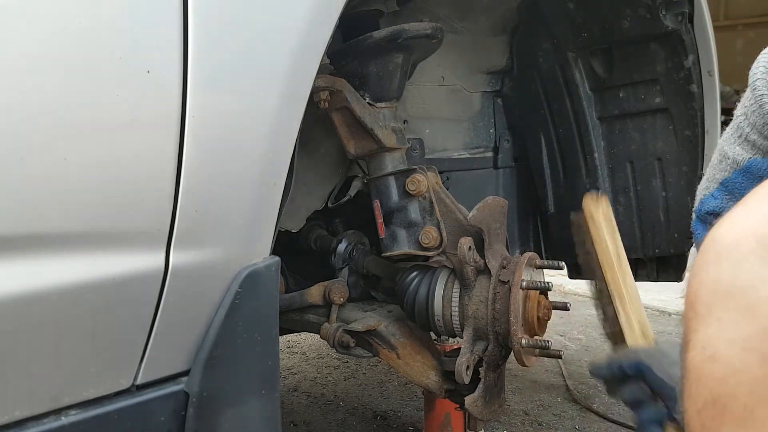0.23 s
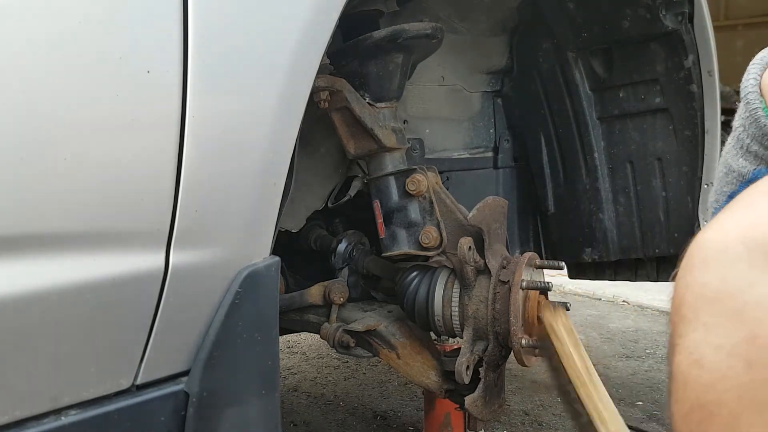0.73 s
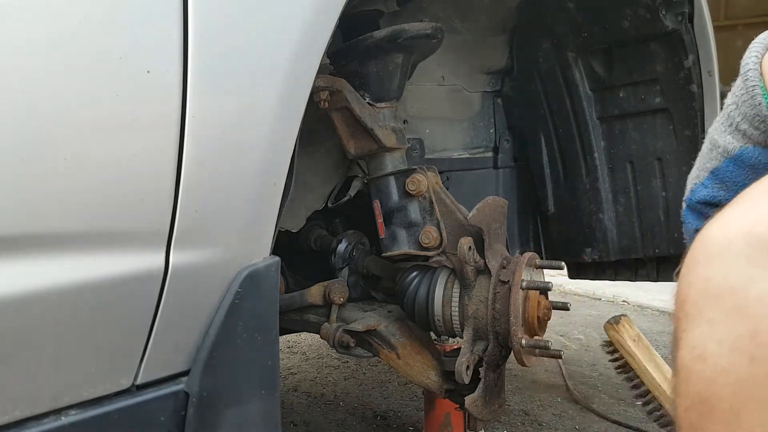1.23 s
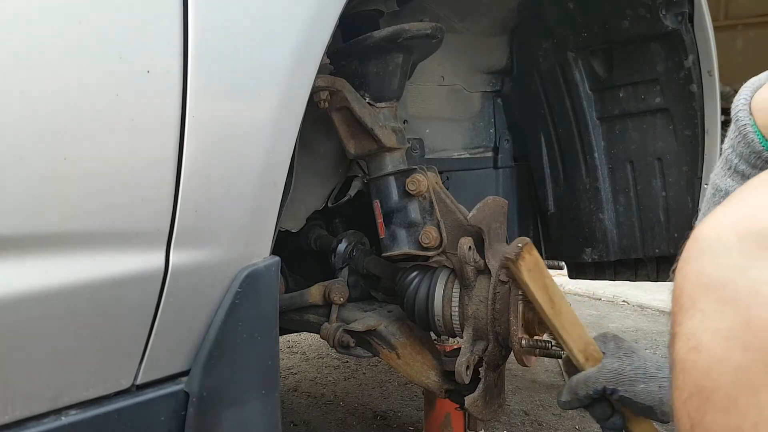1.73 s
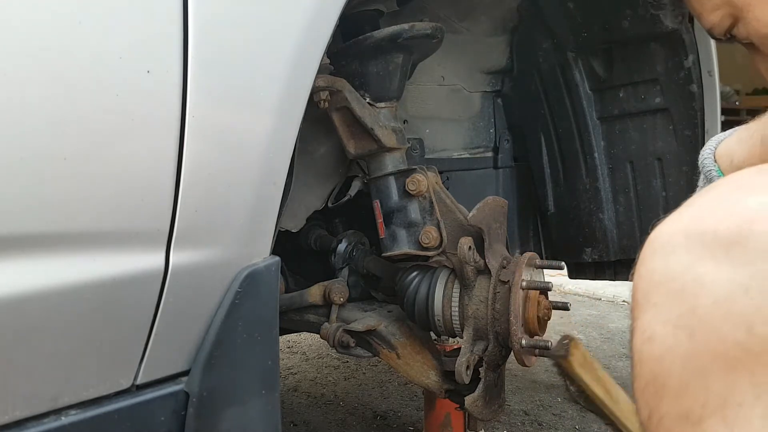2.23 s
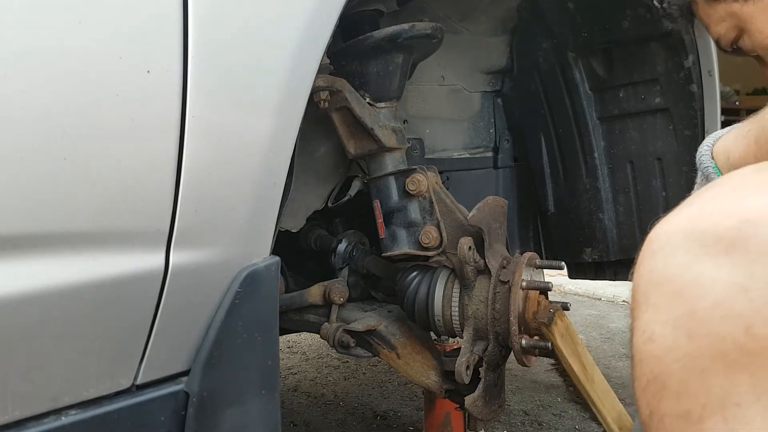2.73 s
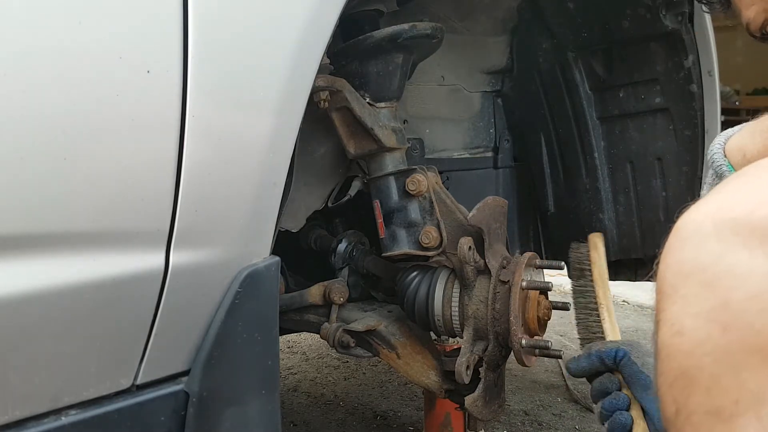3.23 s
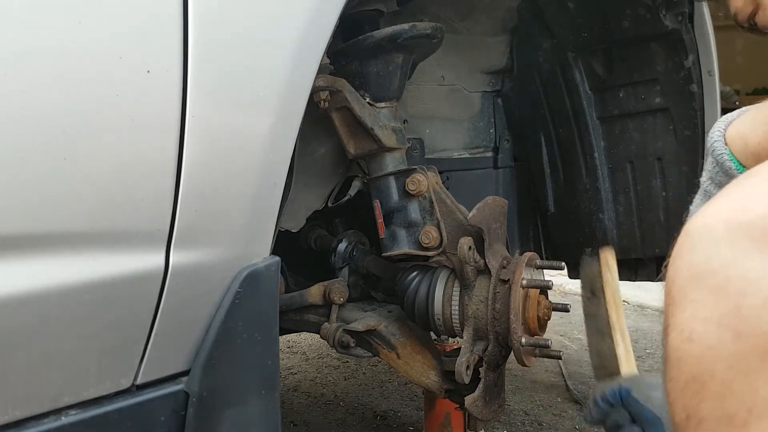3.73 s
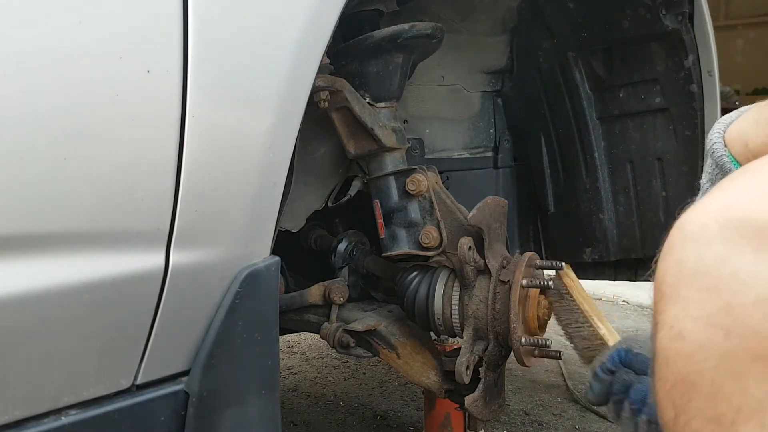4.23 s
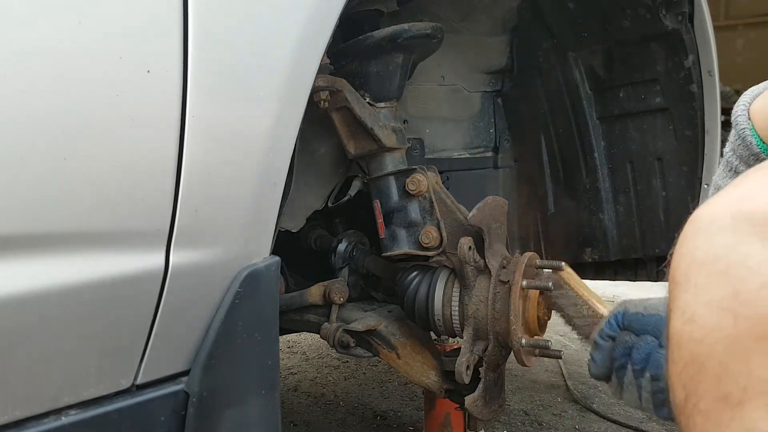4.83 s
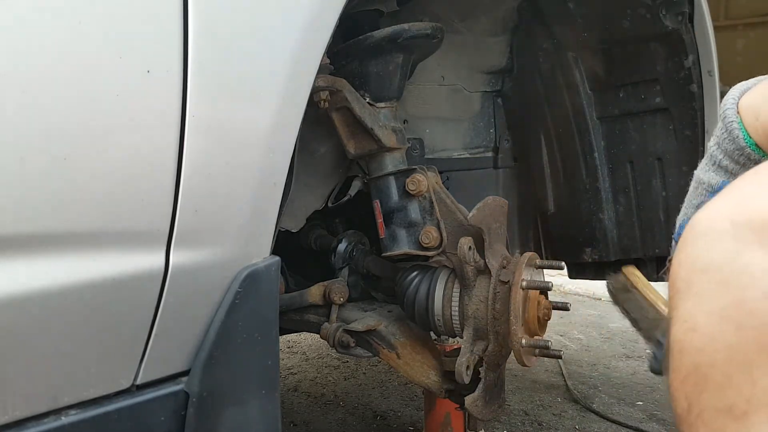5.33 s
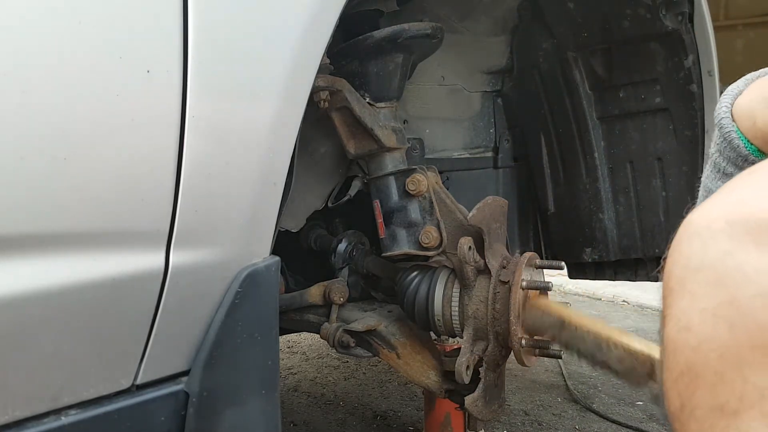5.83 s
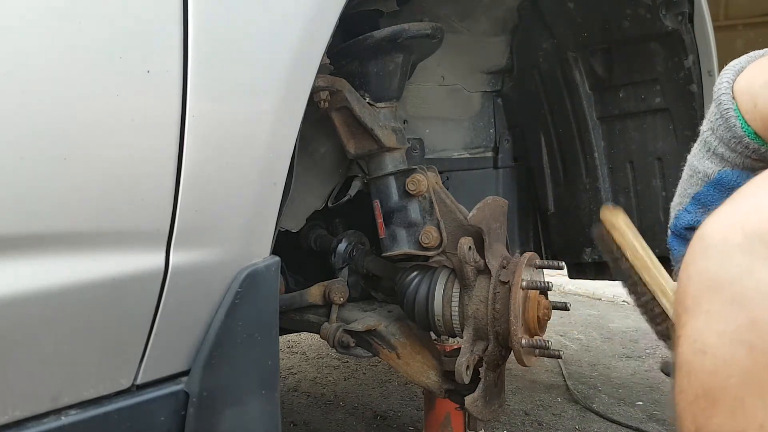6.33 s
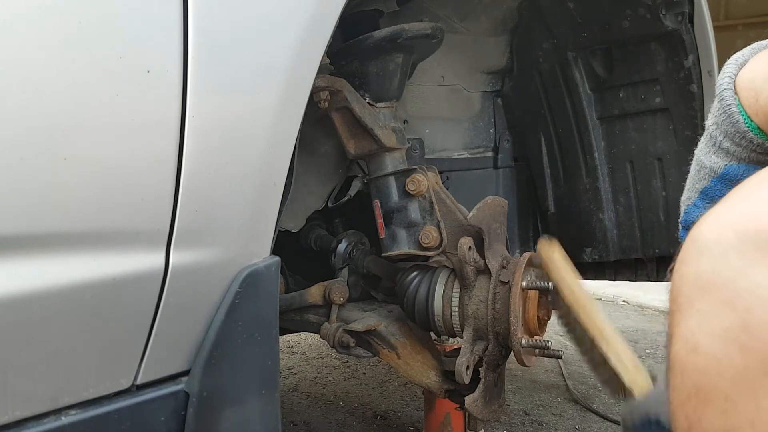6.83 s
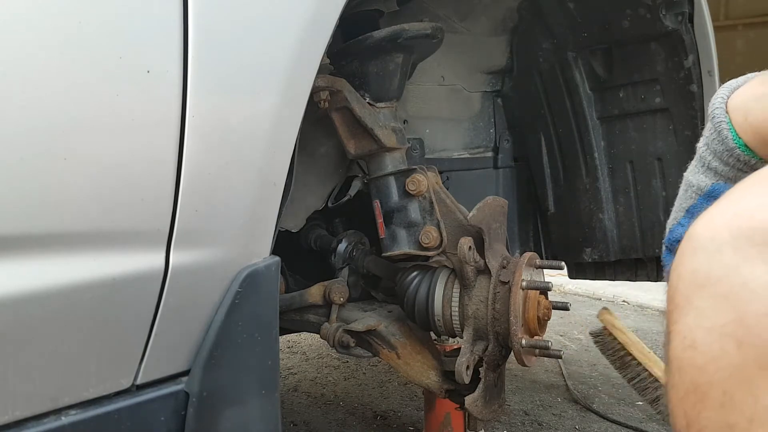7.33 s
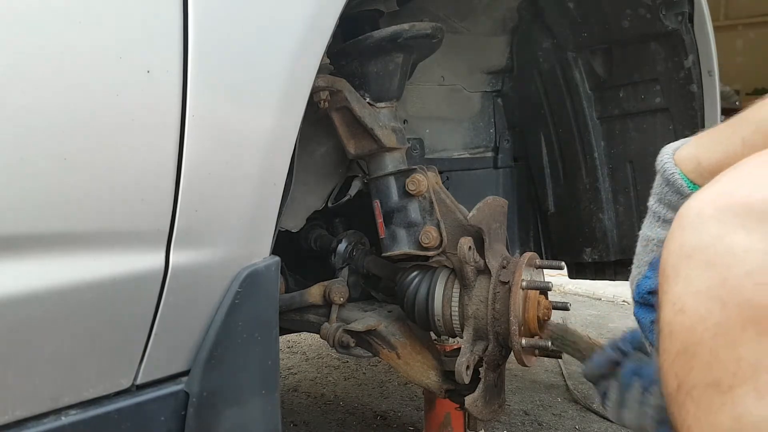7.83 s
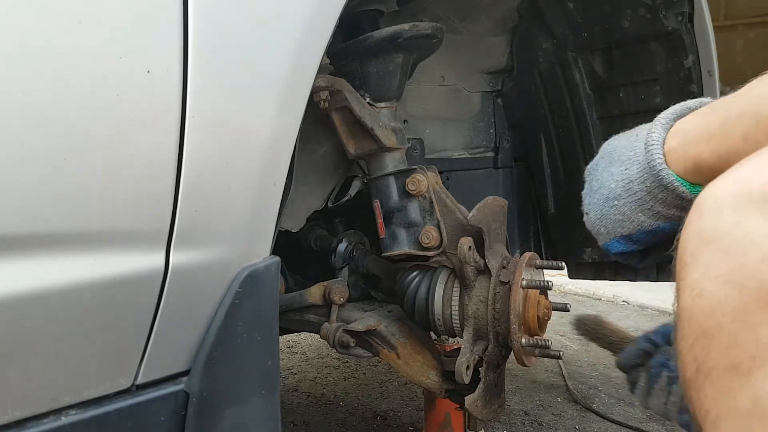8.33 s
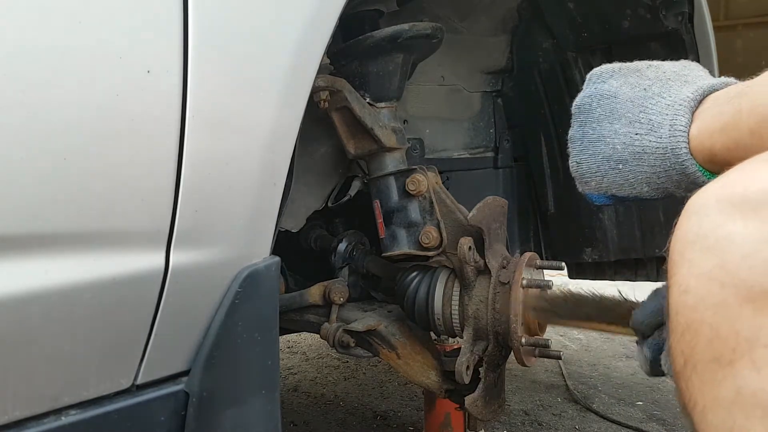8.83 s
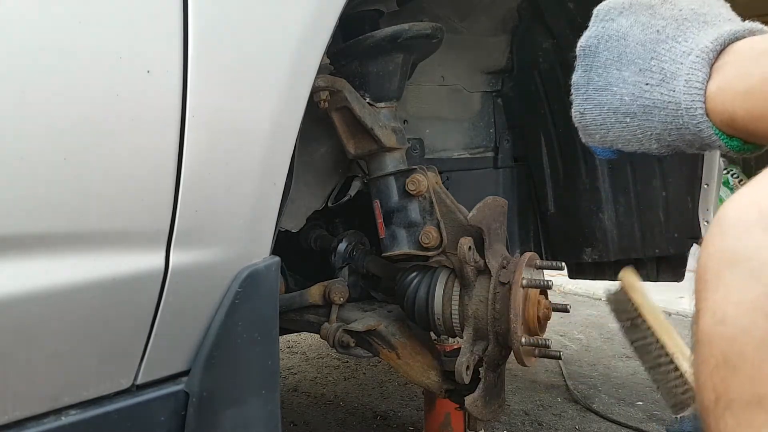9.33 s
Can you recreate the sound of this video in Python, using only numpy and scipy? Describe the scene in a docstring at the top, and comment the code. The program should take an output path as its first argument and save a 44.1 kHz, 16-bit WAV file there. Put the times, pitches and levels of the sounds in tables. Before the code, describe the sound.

Close, rasping wire brush strokes on rusty car metal, the wooden back clacking against the studs as the hub rings faintly.

```python
"""A steel wire brush with a wooden back is swept across a rusty wheel hub in a garage.
Stick-slip friction makes the wires hiss and scrape, and the load rumbles through the suspension.
The back knocks against the wheel studs; the hub flange rings on in beating modes after each stroke.
Behind it are a rustling glove, flicking wires, far metal taps and an outdoor hum. The garage
reverberates, and a phone with two microphone ports stands close by."""
import sys
import numpy as np
from scipy import signal
from scipy.fft import rfft, irfft, next_fast_len
from scipy.io import wavfile
from scipy.ndimage import uniform_filter1d, map_coordinates

SR = 44100
rng = np.random.default_rng(int(sys.argv[2]) if len(sys.argv) > 2 else 0)


def pcm_store(signal):
    """Save signal as 16-bit PCM."""
    levels = np.round(np.clip(np.atleast_2d(signal), -1, 1) * 32767)
    wavfile.write(sys.argv[1], SR, levels.astype(np.int16).T)


N = 423360

# Brush strokes: start_s, bite_db, tick_db, full_pressure_db, full_after_s, lift_after_s, weight_db,
# low_ring_db, middle_ring_db, high_ring_db
STROKES = [(0.043, -46.0, -29.0, -52.5, 0.031, 0.097, -3, -69, -61, -60),
           (0.377, -45.5, -33.5, -50.5, 0.039, 0.099, -4, -59.0, -61.5, -63.5),
           (0.701, -42, -25, -48.5, 0.045, 0.12, -5, -59.5, -56.5, -61),
           (1.028, -45.5, -31.5, -49.5, 0.027, 0.11, -1.5, -59, -61.5, -61.5),
           (1.434, -70, -60.0, -71.0, 0.058, 0.052, 0, -86, -94.0, -94),
           (1.821, -61, -30.5, -78.0, 0.049, 0.066, 0, -66, -76, -76.0),
           (1.9, -74, -43.5, -58.5, 0.075, 0.12, -7, -76.0, -80.0, -74.0),
           (2.04, -70, -60.0, -50, 0.084, 0.21, -10, -72, -70, -69.0),
           (2.416, -53.5, -39, -51, 0.095, 0.16, -1, -57, -61, -61),
           (2.739, -64, -37, -52, 0.031, 0.044, 5.5, -58, -85.0, -70),
           (2.842, -62, -52, -66.5, 0.007, 0.016, 3, -71, -84, -87),
           (3.427, -50.5, -30, -49.5, 0.13, 0.18, -2, -52, -62, -59.5),
           (3.9, -43, -28.0, -51, 0.03, 0.1, 1, -60.5, -62, -73),
           (4.233, -48.5, -34.0, -52, 0.057, 0.12, -4, -67, -69.0, -67.0),
           (4.533, -49.5, -37.5, -49, 0.088, 0.11, -1.5, -61.5, -75.0, -59.5),
           (4.84, -54, -42, -53.0, 0.082, 0.12, 0, -70.0, -82.0, -79.0),
           (5.157, -45, -30, -50, 0.067, 0.1, 3, -68, -64.5, -61),
           (5.469, -46.5, -35.0, -52.0, 0.053, 0.11, 3, -64, -67, -74.0),
           (5.772, -48.5, -32.5, -50.5, 0.08, 0.11, 3, -64.0, -61.5, -64.5),
           (6.079, -50.5, -38.5, -51.0, 0.087, 0.11, 4.5, -62.0, -56, -66),
           (6.56, -39.5, -27, -48, 0.071, 0.096, 1.5, -58, -57, -60),
           (6.877, -68.0, -32, -49.5, 0.058, 0.096, 1, -63.0, -58, -60.5),
           (7.187, -62, -43, -51.5, 0.028, 0.12, 2.5, -56.5, -68.0, -65.0),
           (7.817, -52, -27.5, -52.5, 0.045, 0.12, -2.5, -71.0, -75.0, -74.0),
           (8.117, -47, -29, -50, 0.069, 0.11, 0, -56, -61.5, -59),
           (8.42, -48, -42, -51.5, 0.057, 0.14, -0.5, -66.0, -62, -62.5),
           (8.719, -69, -38, -50, 0.056, 0.11, 7, -53.0, -54.5, -68),
           (9.07, -42, -23.0, -51.5, 0.05, 0.066, -2, -65.5, -60, -61.5)]
# Mode pairs of the hub flange: pitch_hz, split_hz, t60_s
FLANGE_MODES = [(3901, -8, .65), (4558, -8, 1.2), (6244, 10, .38), (8138, -21, .26), (11083, -37, .3)]
# Modes of a wheel stud: pitch_hz, width_hz, level_db
STUD_MODES = [(2436, 157, 3.5), (3300, 83, -11), (3660, 53, -16), (3900, 94, 5), (5060, 110, -2.5),
              (6400, 430, -2.5)]


def amp(db):
    return 10 ** (np.asarray(db) / 20)


def unit(x):
    return x / np.sqrt(np.mean(x ** 2) + 1e-20)


def along(points, hz):
    """Interpolation of (frequency_hz, value) points on a logarithmic frequency axis."""
    f, v = np.transpose(points)
    return np.interp(np.log(hz + 1), np.log(f + 1), v)


def wobble(rate):
    """Smooth random modulation with rate knots a second."""
    return map_coordinates(rng.standard_normal(int(N * rate / SR) + 4), [np.arange(N) * rate / SR])


def filtered(x, response):
    """Linear filtering: the spectrum of x times a complex frequency response."""
    m = next_fast_len(N + SR // 2)
    return irfft(rfft(x, m) * response(np.fft.rfftfreq(m, 1 / SR)), m)[..., :N]


def resonances(modes):
    """Modal superposition: damped resonators (pitch_hz, width_hz, level_db) add with alternating sign."""
    return lambda f: sum((-1) ** k * amp(db) * 1j * f * width / (hz * hz - f * f + 1j * f * width)
                         for k, (hz, width, db) in enumerate(modes))


def stereo(pair, coherence):
    """Partial coherence: two unrelated signals mix as mid and side into left and right."""
    angle = lambda hz: np.arccos(np.clip(along(coherence, hz), -1, 1)) / 2
    mid, side = filtered(pair, lambda hz: np.array([np.cos(angle(hz)), np.sin(angle(hz))]))
    return np.array([mid + side, mid - side])


def grit(spectrum, grain_rate, grain_db):
    """Random amplitude modulation: a coloured noise pair of rms 1 whose level jumps in grains."""
    grains = amp(grain_db * wobble(grain_rate)) * rng.standard_normal((2, N))
    return unit(filtered(grains, lambda hz: amp(along(spectrum, hz))))


def blows(events, modes, crack, vary_db):
    """Impact excitation: an impulse and a dying rattle drive the modes at each (start_s, db, t60_s)."""
    out, t = np.zeros((2, N + SR)), np.arange(SR // 4) / SR
    hz = np.fft.rfftfreq(len(t), 1 / SR)
    fade = np.clip(20 * (t[-1] - t) - 1, 0, 1)
    shapes = np.array([(-1) ** k * resonances([mode])(hz) for k, mode in enumerate(modes)])
    for s, db, t60 in events:
        shake = amp(-60 * t / max(t60, .001)) * rng.standard_normal((2, len(t)))
        shake[:, 0] = crack
        response = amp(vary_db * rng.standard_normal(len(modes))) @ shapes
        sound = fade * irfft(rfft(shake) * response, len(t))
        out[:, round(s * SR):][:, :len(t)] += amp(db) * sound / np.abs(sound).max(axis=1, keepdims=True)
    return out[:, :N]


def outdoor_hum():
    """Ambient noise enters through the open door, its level swaying a little."""
    # Spectrum of the hum: frequency_hz, density_db
    spectrum = [(12, -23), (20, -13), (43, -1.5), (200, -7), (289, -11.5), (404, -6.5), (729, -13.5),
                (2510, -18.5), (2810, -23), (4930, -28), (9670, -41.5), (15200, -31.5), (16500, -49)]
    # Likeness of left and right: frequency_hz, coherence
    coherence = [(60, .45), (600, .3), (1500, .05)]
    hum = unit(stereo(grit(spectrum, grain_rate=20, grain_db=2.0), coherence))
    sway = amp(wobble(1.5))
    return amp(-56.5) * sway * hum


def garage(x):
    """Reverberation: convolution with a noise tail in which each frequency decays at its own rate."""
    # Reverberation times: frequency_hz, t60_s
    decay_times = [(150, 1), (500, 0.5), (1500, 0.37), (4000, 0.35), (10000, 0.22)]
    hz, t, spectra = signal.stft(rng.standard_normal((2, SR // 2)), SR, nperseg=256)
    decay = amp(-60 * t / along(decay_times, hz)[:, None])
    tail = signal.istft(spectra * decay, SR, nperseg=256)[1]
    delayed = np.pad(x, ((0, 0), (300, 0)))
    return signal.fftconvolve(delayed, tail / np.linalg.norm(tail[0]), axes=1)[:, :N]


def far_taps():
    """Light impacts excite the narrow modes of something metal further off."""
    # Taps: start_s, level_db
    taps = [(3.7808, -43.5), (3.8605, -40.5), (4.02, -44.5), (9.2424, -54)]
    # Modes of the metal: pitch_hz, width_hz, level_db
    modes = [(1460, 62, -5), (2060, 73, -17), (2333, 30, -5), (2970, 84, -11.5)]
    return amp(2.5) * blows([(s, db, .6) for s, db in taps], modes, crack=3.6, vary_db=1)


def glove_rustle():
    """Light friction of glove and wires swells and fades between strokes."""
    # Hand movements: middle_s, length_s, level_db
    moves = [(1.4, 0.17, -63), (3.22, .04, -71.5), (6.3, 0.028, -58.5), (6.45, .12, -56),
             (7.456, .04, -59.5), (7.73, 0.14, -62.5), (9.255, 0.035, -58.5), (9.36, 0.13, -76)]
    # Spectrum of the rustle: frequency_hz, density_db
    spectrum = [(350, -41), (600, -9), (891, -2.5), (1020, -14), (1500, -1), (3570, -20.5), (4720, -17),
                (6000, -26), (7800, -60), (13200, -120)]
    t, fade_db_per_s = np.arange(N) / SR, 350
    stir = sum(amp(db - fade_db_per_s * np.maximum(np.abs(t - s) - length / 2, 0))
               for s, length, db in moves)
    return amp(2.0) * stir * grit(spectrum, grain_rate=72, grain_db=1.0)


def wire_ticks():
    """Loose wires flick; heavy damping leaves only a short tick."""
    # Flicks: start_s, level_db
    flicks = [(1.3992, -48.5), (1.4815, -50), (2.6394, -44), (3.2236, -54.5), (7.666, -59), (8.04, -51.5)]
    modes = [(3400, 1200, 22), (10900, 9000, -28)]
    return amp(6.0) * blows([(s, db, .06) for s, db in flicks], modes, crack=1.5, vary_db=1)


def flange_ring():
    """Split mode pairs swell under a stroke, then beat in free decay until the next takes over."""
    out, t = np.zeros((2, N + 2 * SR)), np.arange(-SR // 8, SR * 2 // 3) / SR
    mid_side_phase = np.array([[0], [np.pi / 2]])  # mid and side of the ring run a quarter cycle apart, which keeps its level steady
    swell = lambda t: np.clip(1 + t / 0.1, 0, 1)
    free_s = [row[0] + row[5] + .03 for row in STROKES]  # free decay begins just after lift-off
    for (*_, low_db, mid_db, high_db), s, next_s in zip(STROKES, free_s, free_s[1:] + [np.inf]):
        top_db = high_db + np.array([-10.5, -18]) + rng.normal(0, 3.6, size=2)
        start = SR + round(s * SR) - SR // 8
        for (hz, split_hz, t60), db in zip(FLANGE_MODES, [low_db, mid_db, high_db, *top_db]):
            phase, twin_phase = 2 * np.pi * rng.random(2)
            twin_share = .2 + .4 * rng.random()
            tone = np.sin(2 * np.pi * hz * t + phase + mid_side_phase)
            twin = twin_share * np.sin(2 * np.pi * (hz + split_hz) * t + twin_phase + mid_side_phase)
            envelope = swell(t) * amp(-60 * np.maximum(t, 0) / t60) * (1 - swell(t + s - next_s))
            out[:, start:][:, :len(t)] += amp(db + 6.5) * envelope * (tone + twin)
    return out[:, SR:SR + N]


def knocks():
    """Each impact cracks and excites the modes of hub, wooden back and stud in its own proportion."""
    # The back catching on studs and flange: start_s, level_db, relative_thud_db
    catches = [(.085, -23, 0.5), (.212, -38.5, -12), (.408, -30.5, 4), (.735, -30, 8), (1.053, -23, 2.5),
               (2.462, -29, -5.5), (2.489, -24, -11), (2.605, -22.5, -7), (2.747, -13, -11.5),
               (3.445, -34.5, -10), (3.58, -21.5, 0), (3.601, -22.5, -20), (3.912, -26, 7.5),
               (3.939, -26, -2.5), (4.25, -33.5, 5), (4.311, -8, -13.5), (4.593, -13, -10),
               (4.628, -26, -3), (4.897, -22, -7), (4.933, -25, -5), (4.95, -19, -10.5), (5.196, -19.5, 0),
               (5.246, -11, -10), (5.516, -7, -11.5), (5.554, -23, -7), (5.574, -21, -10.5),
               (5.813, -28, 4.5), (5.857, -18, -11), (5.885, -20.5, -11), (6.124, -24.5, -1),
               (6.165, -21, 5.5), (6.596, -30.5, 1), (6.617, -9, -10), (6.668, -27.5, -7),
               (6.917, -7.5, -9.5), (6.944, -17.5, -13.5), (6.984, -21, -9.5), (7.222, -10, -8.5),
               (7.239, -11.5, -13.5), (7.89, -22.5, -3.5), (8.165, -17, -8), (8.226, -27.5, -4),
               (8.441, -33, -15), (8.46, -20.5, -7), (8.529, -29.5, -2.5), (8.736, -24, -1.5),
               (8.785, -24, 2.5), (8.816, -3, -28), (8.826, -16.5, -19), (9.103, -37, -22),
               (9.126, -28.5, -19)]
    # Wire tips ticking a stud in mid-stroke: start_s, level_db
    tip_taps = [(1.947, -33.5), (1.963, -31), (1.987, -36.5), (2.073, -30.5)]
    # Modes of the hub: pitch_hz, width_hz, level_db
    hub_modes = [(960, 79, -4), (1293, 580, 0.5), (1786, 285, 0), (2196, 63, -3.5), (2915, 33, -3)]
    # Modes of the wooden back: pitch_hz, width_hz, level_db
    wood_modes = [(317.6, 51, 2), (480, 95, 2), (645, 192, -3.5), (751.6, 30.3, 5), (924, 163, -6)]
    landings = [(s + .003, db) for s, _, db, *_ in STROKES]
    # a knock with more wood in it rattles longer
    hits = [(s, db, thud_db, -20.5, .075 + .002 * thud_db) for s, db, thud_db in catches]
    ticks = [(s, db, -23.5, -1.5, .047) for s, db in tip_taps + landings]
    s, db, thud_db, ping_db, t60 = np.transpose(hits + ticks)
    snap_modes = [(1660, 1640, 0.0202), (2890, 1700, 0.59)]
    snap = amp(2.0) * blows(zip(s, db, np.full_like(s, .0017)), snap_modes, crack=1.76, vary_db=-0.5)
    hub = amp(-3.5) * blows(zip(s, db, t60), hub_modes, crack=5.6, vary_db=3.5)
    wood = amp(5.0) * blows(zip(s, db + thud_db, 1.86 * t60), wood_modes, crack=7.2, vary_db=2)
    stud = amp(9.0) * blows(zip(s, db + ping_db, 0.97 * t60), STUD_MODES, crack=4.0, vary_db=5)
    radiation = lambda hz: (1j * hz / (240 + 1j * hz)) ** 2  # too small a body to radiate bass
    cushion = lambda hz: (5500 / (5500 + 1j * hz)) ** 3  # wood and wire soften the blow
    return filtered(snap + hub + wood + stud, lambda hz: radiation(hz) * cushion(hz))


def pressure():
    """Contact force envelopes: each stroke bites at once, presses up to its full, sags and lifts off."""
    rise_db_per_s, sag_db_per_s, lift_db_per_s = 135, 59, 410
    bite, press, dig, load = np.zeros((4, N + SR))
    t = np.arange(SR // 2) / SR
    after = lambda s: np.maximum(t - s, 0)
    for s, bite_db, _, full_db, full_s, lift_s, weight_db, *_ in STROKES:
        span = slice(round(s * SR), round(s * SR) + len(t))
        rising_db = full_db - rise_db_per_s * np.maximum(full_s - t, 0)
        db = rising_db - sag_db_per_s * after(full_s) - lift_db_per_s * after(lift_s)
        bite[span] += amp(bite_db - 700 * t)
        press[span] += amp(db)
        dig[span] += amp(db - 32 * t)  # the wires bend over and their tips dig less
        load[span] += amp(db + weight_db + 62 * t)  # the suspension takes more and more load
    return uniform_filter1d(np.array([bite, press, dig, load])[:, :N], SR // 400)


def suspension(load):
    """Structure-borne sound: the load rumbles through the suspension and rocks the car on its stand."""
    # Spectrum of the rumble: frequency_hz, density_db
    rumble_spectrum = [(140, -12), (230, -11), (303, -6.5), (473, -7.5), (752, -6), (892, -17), (991, -4.5),
                       (1100, -13.5), (1430, -10), (2420, -120)]
    # Spectrum of the rocking: frequency_hz, density_db
    rock_spectrum = [(20, -21), (40, -13), (70, -3.5), (130, 7.5), (220, -11), (400, -82)]
    rumble = amp(4) * load * grit(rumble_spectrum, grain_rate=60, grain_db=5)
    push = np.abs(uniform_filter1d(load, SR // 20))  # the heavy car follows the pressure slowly
    return rumble + amp(-7.5) * push * grit(rock_spectrum, grain_rate=10, grain_db=2.5)


def brushing(bite, press, dig):
    """Stick-slip friction: wires hiss, rust scrapes, and studs and flange rasp in forced vibration."""
    # Spectrum of the slipping wires: frequency_hz, density_db
    wire_spectrum = [(1760, -26), (3000, -5), (3820, 5.5), (5950, -5), (6440, -3), (6960, -7), (7860, -9.5),
                     (10000, -13.5), (12600, -9.5), (15100, -13), (16200, -1), (16500, -47)]
    # Spectrum of the scraped rust: frequency_hz, density_db
    rust_spectrum = [(470, -44), (800, -5.5), (870, -6), (999, -18), (1640, 1), (1890, -6), (2450, 2.5),
                     (3040, -15), (3760, -14), (5000, -21), (6500, -7), (11000, -120)]
    tufts = amp(1.9 * wobble(30))  # rows of wires cross the edges unevenly
    slips = amp(11) * grit(wire_spectrum, grain_rate=400, grain_db=2.0)
    hiss = np.hypot(bite, press * tufts) * slips
    rust = amp(9) * dig * amp(3 * wobble(25)) * grit(rust_spectrum, grain_rate=210, grain_db=0.0)
    damped_modes = STUD_MODES + [(hz, 25, 7.5) for hz, _, _ in FLANGE_MODES]  # wires damp the flange
    rasp = amp(6) * filtered(np.hypot(bite, dig * tufts) * slips, resonances(damped_modes))
    return hiss + rust + rasp


def scene():
    """Superposition of direct sound, reverberation and ambient noise at the two ports."""
    # Likeness of left and right for rubbing, room and small sounds: frequency_hz, coherence
    coherence = [(60, 0.92), (130, 1), (290, 0.86), (640, 0.66), (1410, 0.19), (3100, 0.042), (6820, 0.081),
                 (15000, 0.033)]
    # Likeness of left and right for the knocks: frequency_hz, coherence
    knock_coherence = [(200, 0.89), (1000, 0.79), (2500, 0.73), (6000, 0.31)]
    bite, press, dig, load = pressure()
    rubbed = brushing(bite, press, dig) + suspension(load) + flange_ring()
    struck = knocks()
    room = amp(-14.5) * garage(rubbed + struck)
    small = glove_rustle() + wire_ticks() + far_taps()
    return stereo(rubbed + room + small, coherence) + stereo(struck, knock_coherence) + outdoor_hum()


def record(dry):
    """Microphone response: the ports differ in colour, the left lags, and both are band-limited."""
    # Level difference between the ports: frequency_hz, left_minus_right_db
    imbalance = [(60, -3.0), (110, -3.0), (200, -4.0), (380, -2.5), (700, -3.0), (1290, -2.0), (2380, -2.0),
                 (4400, -1.5), (8120, 9.5), (15000, 7.5)]
    side = np.array([[.5], [-.5]])
    lag_s, bass_hz, edge_hz, top_hz = 1.5 / SR, 45, 15800, 16800
    ports = lambda hz: amp(side * along(imbalance, hz)) * np.exp(-2j * np.pi * hz * side * lag_s)
    high_pass = lambda hz: 1j * hz / (bass_hz + 1j * hz)
    low_pass = lambda hz: np.where(hz > edge_hz, amp(-39), 1) * (hz < top_hz)
    return filtered(dry, lambda hz: ports(hz) * high_pass(hz) * low_pass(hz))


dry = scene()
out = record(dry)
pcm_store(out)
```